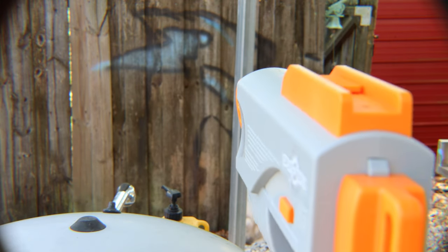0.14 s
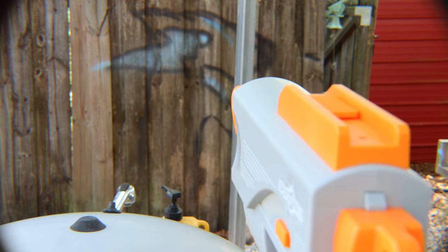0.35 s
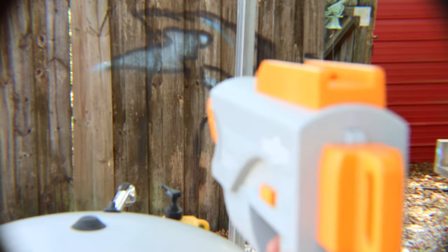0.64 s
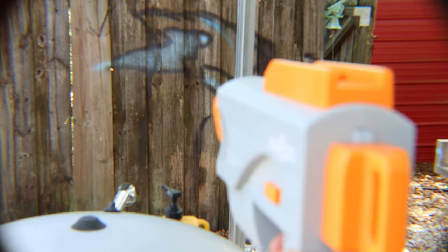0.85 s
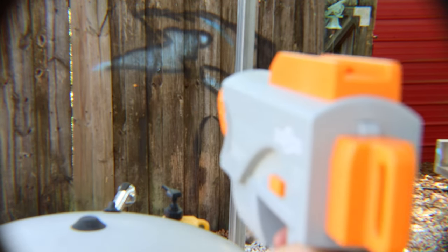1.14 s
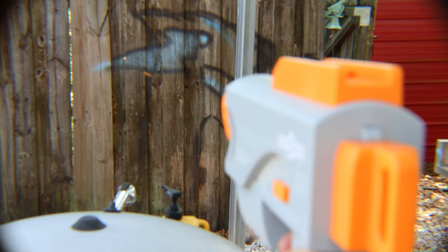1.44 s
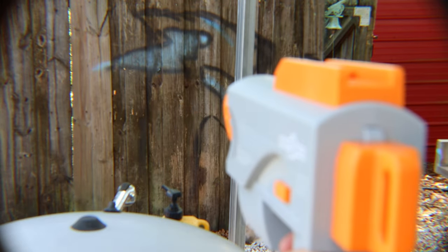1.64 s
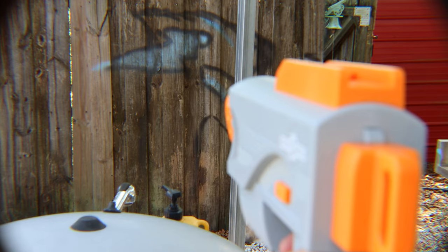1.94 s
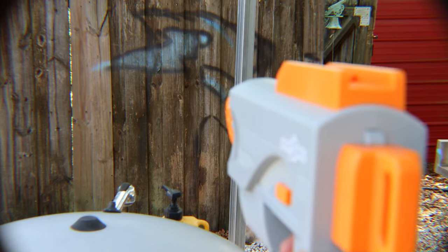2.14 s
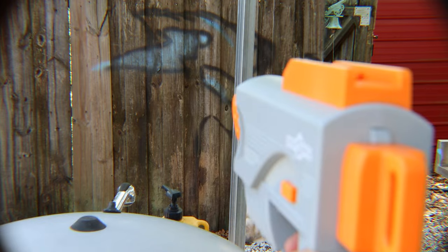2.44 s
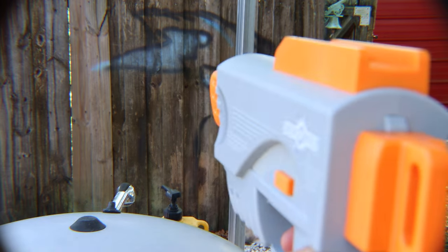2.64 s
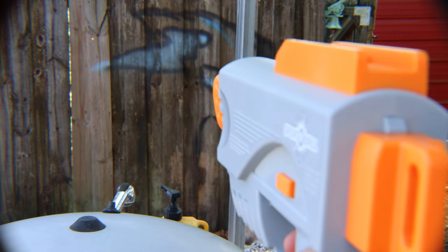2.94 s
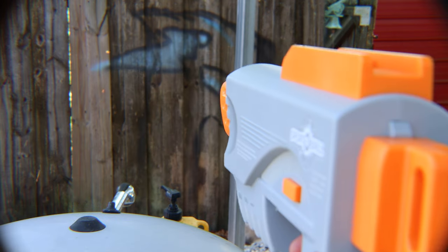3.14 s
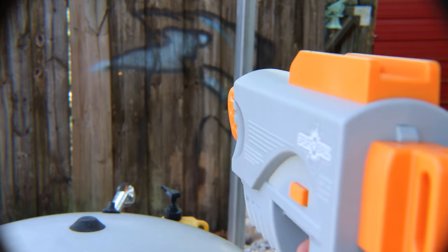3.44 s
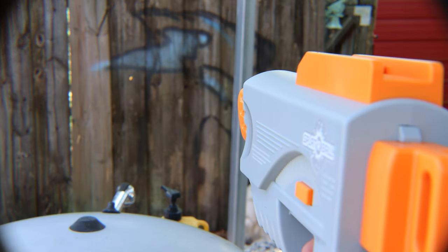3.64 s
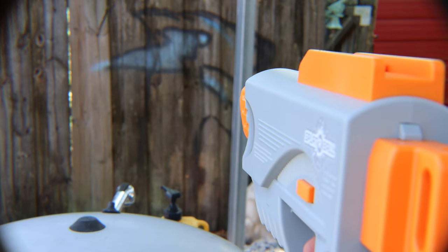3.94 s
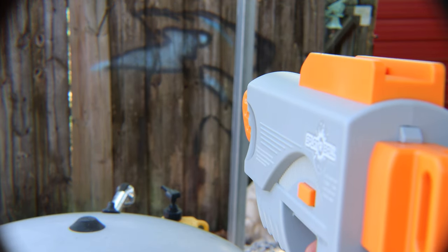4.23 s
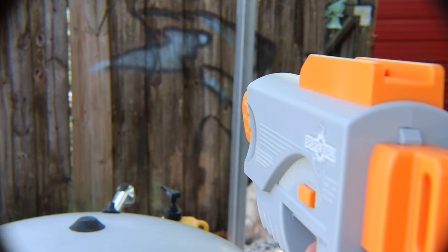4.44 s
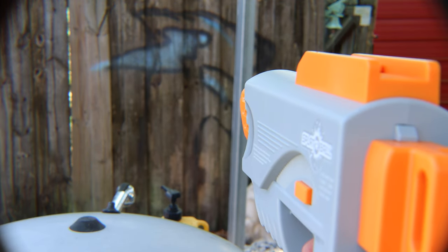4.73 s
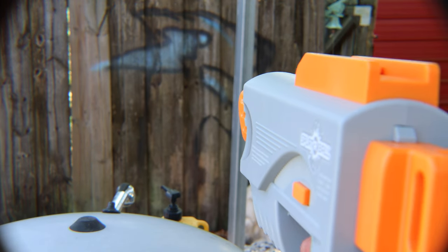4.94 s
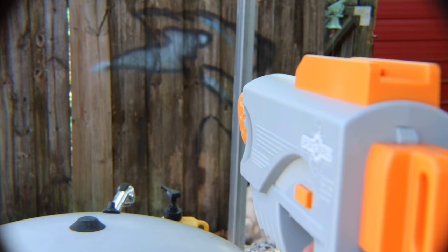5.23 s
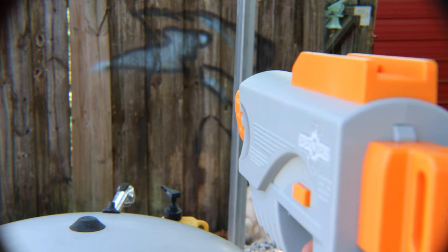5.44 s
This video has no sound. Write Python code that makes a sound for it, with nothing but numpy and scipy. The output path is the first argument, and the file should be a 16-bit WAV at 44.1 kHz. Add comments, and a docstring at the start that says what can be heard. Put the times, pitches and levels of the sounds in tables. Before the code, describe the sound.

Close-up, a motorized toy gun hammers about eight strokes a second, whirring gears, clicks and springy slams, then jams in a short scrape and restarts.

```python
"""A toy blaster rattles close by, about eight strokes a second: a whine that rises briefly and then falls, a click,
a slam, at times a pop. Gear teeth speed up briefly, then slow, as they compress a spring; a latch clicks and the
piston slams into the plastic shell. On some strokes trapped air bursts out behind a pellet; once, near the end,
the cycle stalls in a rumbling scrape. Gears are pulses and noise through resonances, impacts are causal filter
responses, the stall is shaped noise. A low hum of wavering sines and faint outdoor noise lie underneath."""
import sys
import numpy as np
from scipy import signal
from scipy.fft import rfft, irfft, next_fast_len
from scipy.io import wavfile
from scipy.ndimage import uniform_filter1d

SR = 44100
rng = np.random.default_rng(int(sys.argv[2]) if len(sys.argv) > 2 else 0)


def materialize(psi):
    """Save the field psi as 16-bit PCM at rate SR to the path in sys.argv[1].

    A 1-D psi becomes a single channel; in a 2-D psi each row is a channel.
    """
    bounded = np.clip(np.atleast_2d(psi).T, -1, 1)
    quanta = np.round(bounded * 32767).astype(np.int16)
    wavfile.write(sys.argv[1], SR, quanta)


N = 246739
TIME = np.arange(N) / SR


def undb(db):
    """Logarithmic level: decibels become an amplitude gain."""
    return 10 ** (np.asarray(db) / 20)


def unit(x):
    """Normalisation: scale a signal to an rms of 1."""
    return x / np.sqrt(np.mean(x ** 2))


def add(out, start_s, x):
    """Superposition: mix x into out from start_s."""
    i = max(0, int(round(start_s * SR)))
    out[i:i + len(x)] += x[:max(0, len(out) - i)]


def curve(table, at):
    """Linear interpolation: each column of a table joined by straight lines over its first."""
    key, *columns = np.transpose(table)
    return [np.interp(at, key, column) for column in columns]


def slope(points, size):
    """Spectral envelope: gain of (Hz, dB) points on transform bins, straight over log frequency."""
    hz, db = np.transpose(points)
    bins_hz = np.fft.rfftfreq(size, 1 / SR)
    return undb(np.interp(np.log(bins_hz + 1), np.log(hz), db))


def peaks(modes, size):
    """Modal resonance: gain of (Hz, width Hz, dB) peaks on transform bins, summed in power."""
    bins_hz = np.fft.rfftfreq(size, 1 / SR)
    power = 0
    for hz, width_hz, db in modes:
        power = power + (undb(db) / (1 + (2 * (bins_hz - hz) / width_hz) ** 2)) ** 2
    return np.sqrt(power)


def colour(x, shape, table):
    """Linear filtering: multiply the spectrum by slope or peaks, then scale to rms 1."""
    size = next_fast_len(len(x))
    filtered = irfft(rfft(x, size) * shape(table, size), size)
    return unit(filtered[:len(x)])


def ring(gain, spread_s, order=40):
    """Dispersion: a causal unit-energy response whose frequencies take paths of unequal delay, rms spread_s."""
    # folding the cepstrum onto positive time gives the minimum-phase response
    cepstrum = irfft(np.log(gain + 1e-7))
    size = len(cepstrum)
    cepstrum[1:size // 2] *= 2
    cepstrum[size // 2 + 1:] = 0
    # noise smoothed over order bins sets the extra delay of each frequency
    smooth = uniform_filter1d(uniform_filter1d(rng.standard_normal(len(gain)), order), order)
    late_s = spread_s * np.abs(unit(smooth))
    lag = 2 * np.pi * np.cumsum(late_s) * SR / size
    response = irfft(np.exp(rfft(cepstrum) - 1j * lag))
    fade = np.cos(np.linspace(0, np.pi / 2, size)) ** 2
    return unit(response * fade) / np.sqrt(size)


def walk(rate_hz):
    """Random modulation: normal draws at rate_hz, joined by straight lines, with a spread near 1."""
    count = int(N / SR * rate_hz) + 2
    return 1.2 * np.interp(TIME * rate_hz, np.arange(count), rng.standard_normal(count))


# Runs of nearly evenly spaced strokes. Each row: first latch click in seconds, last latch click in seconds.
BURSTS = [(0.0736, 0.5605), (0.6358, 2.4714), (2.6827, 3.5369), (3.6558, 4.8924), (5.2841, 5.5337)]
# nominal turn of the gearbox, and how much longer each turn in a run takes than the one before as the motor tires
CYCLE_S, SLOWING_S = .1225, .00007
FLIGHT_S = .0252  # from latch click to piston slam
# relative levels with an empty barrel, and their chance scatter from stroke to stroke
EMPTY_LATCH_DB, EMPTY_SLAM_DB, EMPTY_GEARS_DB, SCATTER_DB = -.3, -.7, -1.1, .4
# once the gear slips early: a weak slam and no latch click
SLIP_S, SLIP_DB = 2.5885, -7
# once the cycle stalls after a muted latch click, until the piston lets go
STALL_S, RELEASE_S, STALL_LATCH_DB = 5.0182, 5.1778, -3


def strokes():
    """Periodic excitation: all cycles as (latch click s, slam s, latch dB, slam dB, gears dB), in order."""
    rows = [(SLIP_S - FLIGHT_S, SLIP_S, -np.inf, SLIP_DB, EMPTY_GEARS_DB),
            (STALL_S, RELEASE_S, STALL_LATCH_DB, EMPTY_SLAM_DB, EMPTY_GEARS_DB)]
    empty_db = np.array([EMPTY_LATCH_DB, EMPTY_SLAM_DB, EMPTY_GEARS_DB])
    for first_s, last_s in BURSTS:
        turns = int(round((last_s - first_s) / CYCLE_S))
        k = np.arange(turns + 1)
        even_s = first_s + (last_s - first_s) * k / turns
        for latch_s in even_s - SLOWING_S * k * (turns - k) / 2:
            levels = empty_db + SCATTER_DB * rng.standard_normal(3)
            # a pellet soon after the click gives the stroke its own levels
            for pellet_s, _, _, *loaded in PELLETS:
                if 0 < pellet_s - latch_s < CYCLE_S / 2:
                    levels = loaded
            rows.append((latch_s, latch_s + FLIGHT_S, *levels))
    return sorted(rows)


# Low hum. Each row: frequency in Hz, rms level in dB.
HUM = [(58, -41.5), (107, -44.5), (117, -51)]
# Spectrum of the outdoor air. Each row: frequency in Hz, relative level in dB.
YARD_AIR = [(20, -26), (36, -16), (50, -13), (80, 3), (120, -5), (200, -12), (500, -7.5), (1500, -2),
            (5000, -25), (10000, -30), (16000, -41)]


def yard():
    """Additive synthesis: sines wavering in pitch and level hum over filtered noise, the outdoor air."""
    hum = 0
    for hz, db in HUM:
        wavering_hz = hz + 1.6 * walk(14)
        tone = undb(1.5 * walk(9)) * np.sin(2 * np.pi * np.cumsum(wavering_hz) / SR)
        hum = hum + undb(db) * unit(tone)
    air = colour(rng.standard_normal(N), slope, YARD_AIR)
    return hum + undb(-38 + walk(3.02)) * air


# Course of one stroke. Each row: share of the cycle from 0 to 1, tooth rate in Hz, and the relative levels
# of teeth and grinding in dB.
STROKE = [(0, 1700, -24, -3.5), (.2, 2018, -10, -3.5), (.42, 1956, -3, -1.5), (.59, 1783, -0.5, 0.5),
          (.7, 1680, 0.5, 1), (.8, 1609, -1, 2), (.92, 1521, 0, 1.5), (1, 1499, 0.5, 3.5)]
# Gearbox wall that radiates the whine. Each row: frequency in Hz, width in Hz, relative level in dB.
GEARBOX = [(1868, 430, -0.5), (3295, 410, 0), (5560, 410, -16), (6200, 1100, -38)]
# Spectrum of the grinding. Each row: frequency in Hz, relative level in dB.
GRIND = [(40, -12.5), (130, -6), (300, -3.5), (450, -0.5), (700, -3.5), (1300, -3), (2000, 2), (2600, 0.5),
         (3300, 1.5), (4300, -6.5), (6200, -9), (8000, -15), (11000, -23.5), (16000, -42)]
# Sharp rasp of the teeth under load. Each row: frequency in Hz, width in Hz, relative level in dB.
RASP = [(4200, 1000, -1.5), (5150, 980, -2.5), (5970, 1130, -0.5), (7070, 600, -4.5)]
# The aim of the blaster trades fine hiss against rasp. Each row: time in seconds, then relative levels in dB
# of hiss, of rasp, and of grinding and rasp together.
AIM = [(0, -8, -4, 1.5), (.5, -7, -4, .5), (.7, -1.5, -2.5, 0), (2.45, -2.5, -6, .3), (2.7, -9, -0.5, 0),
       (3.6, -8, 0, -1.3), (4.1, -8, 0, .4), (4.9, -7.5, 0, .3), (5.6, -7, -0.5, -1)]
# the spring's note rises as it settles after a slam
SING_FROM_HZ, SING_TO_HZ, SING_SETTLE_S = 378, 397, .02
# its level at a 0 dB slam, its dB per dB of slam, and the share of the cycle at which closing coils silence it
SING_DB, SING_FOLLOWS, SING_END = -27.3, .35, .98


def gears(shots):
    """Gear-mesh excitation: teeth speed up briefly, then slow, and mostly rub harder, as the spring is compressed."""
    phase, drive, effort = np.zeros((3, N))
    start = shots[0][1] - CYCLE_S
    # time since the last slam, and the level of that slam
    age, struck_db = TIME - start, np.full(N, 1. * EMPTY_SLAM_DB)
    for latch_s, slam_s, _, slam_db, gears_db in shots:
        stop = latch_s if latch_s == STALL_S else slam_s
        now = TIME >= start
        phase[now] = np.clip((TIME[now] - start) / (stop - start), 0, 1)
        drive[now] = np.exp(-np.maximum(TIME[now] - stop, 0) / 0.039)  # in a stall the gears coast to rest
        effort[now] = undb(gears_db)
        after = TIME >= slam_s
        age[after], struck_db[after] = TIME[after] - slam_s, slam_db
        start = slam_s
    last = TIME >= start
    phase[last], drive[last] = (TIME[last] - start) / CYCLE_S, 1
    tooth_hz, tooth_db, grind_db = curve(STROKE, phase)

    teeth = np.cumsum(tooth_hz * (1 + .006 * walk(25) + .03 * walk(1600))) / SR  # teeth passed so far
    mesh = sum(np.cos(2 * np.pi * k * teeth) for k in range(1, 5))
    # pinion (9 teeth) and wheel (26) run slightly off centre and every tooth bites differently
    pinion = 1 + .5 * np.cos(2 * np.pi * teeth / 9)
    wheel_db = 3 * np.cos(2 * np.pi * teeth / 26)
    bite = pinion * undb(wheel_db + 2.5 * walk(500))
    whine = colour(mesh * bite, peaks, GEARBOX) * undb(tooth_db)

    # the flanks rub once a tooth
    once_a_tooth = 1 + .5 * np.cos(2 * np.pi * teeth)
    rub = rng.standard_normal((3, N)) * once_a_tooth * undb(1.5 * walk(600))
    hiss_db, rasp_db, gear_db = curve(AIM, TIME)
    grind = colour(rub[0], slope, GRIND) * undb(grind_db - 26.3)
    # rasp grows faster with load than the grinding
    rasp = colour(rub[1], peaks, RASP) * undb(1.5 * grind_db + rasp_db - 31)
    hiss = colour(rub[2], peaks, [(8660, 2400, 0)]) * undb(hiss_db + grind_db - 42.5)

    # each slam sets the spring singing, until it is nearly closed
    settling = (SING_TO_HZ - SING_FROM_HZ) * SING_SETTLE_S * np.exp(-age / SING_SETTLE_S)
    cycles = SING_TO_HZ * age + settling
    note = unit(np.sin(2 * np.pi * (cycles + .04 * walk(100))) * undb(1.5 * walk(80)))
    free = np.clip(np.minimum(phase / .1, 1 - phase / SING_END), 0, 1)
    singing = note * undb(SING_DB + SING_FOLLOWS * struck_db) * free

    loaded = undb(-26.0) * whine + undb(gear_db) * (grind + rasp)
    return drive * (effort * loaded + hiss + singing)


# The latch's bright ring. Each row: frequency in Hz, width in Hz, relative level in dB.
LATCH = [(550, 520, -8), (846, 160, -6.5), (1360, 1900, -6), (2027, 103, 2.5), (2720, 980, -6.5),
         (3480, 140, -8), (4060, 460, -5), (4660, 350, -3.6), (5770, 337, -4), (6400, 1970, -5),
         (6540, 279, -7.5), (8080, 600, -9.5), (9350, 850, -21.5), (11050, 640, -23), (15183, 5300, -27)]


def latch(shots, size=4096):
    """Small-source radiation: a short bright click and its chatter, from a part too small to radiate bass."""
    out = np.zeros(N)
    bass_cut = slope([(60, -27), (220, -29), (450, -6)], size)
    gain = peaks(LATCH, size) * bass_cut
    for latch_s, _, db, *_ in shots:
        snap = ring(gain, spread_s=.0007, order=12)
        chatter = ring(gain, spread_s=.0015, order=12)
        add(out, latch_s, undb(db + 9) * snap)
        add(out, latch_s + 0.00098, undb(db + 6) * chatter)
    return out


# Shell and empty barrel under the piston's blow. Each row: frequency in Hz, width in Hz, relative level in dB.
SHELL = [(168, 55, -12), (228.4, 25, -8), (317.7, 32, -2.5), (365, 69, -4), (523, 85, -6), (603, 32, -8),
         (728, 107, -8.5), (897, 173, -1), (1059, 400, -8.5), (1090, 34, -8.5), (1301, 34, -24.5),
         (1448, 150, -8), (1702, 98, -15), (1825, 190, -6), (2054, 136, -4), (2209, 62, -5.5),
         (2384, 95, -6), (2480, 320, -8.1), (2787, 560, -10.5), (3160, 1200, -38), (3520, 52, -21.5),
         (3540, 300, -57), (3900, 2100, -20.5), (4700, 2200, -30), (6070, 7000, -28), (8560, 800, -31.0)]
# The spring's lasting twang. Each row: frequency in Hz, width in Hz, relative level in dB.
SPRING = [(343, 44.5, -9), (390.8, 9.2, -6), (420, 47, -13), (507, 7.3, -12), (1133, 33.5, -8.5)]
# Tilt of the spring's rattle. Each row: frequency in Hz, relative level in dB.
CLATTER = [(200, -18), (400, 8.5), (900, -1), (1150, 2), (2300, -6.5), (4000, 3), (8000, -20)]
# The spring's rebound against its guide. Each row: frequency in Hz, width in Hz, relative level in dB.
REBOUND = [(1140, 160, -7), (2350, 124, 7.5), (2910, 390, -1.5), (4130, 700, -11)]


def piston(shots, size=8192):
    """Impact excitation: the slam rings the shell, and the spring twangs, surges and rebounds on its guide."""
    out, t = np.zeros(N), np.arange(size) / SR
    blow = ring(peaks(SHELL, size), spread_s=.0024, order=22)
    # the ring is boosted towards 7 ms, then damped as the piston seats
    blow = blow * undb(np.interp(t, [0, .003, .007, .0105], [-0.86, -1.25, 4.3, 0.25]))
    twang = ring(peaks(SPRING, size), spread_s=0.0008)
    surge_db = 2.9 * np.cos(2 * np.pi * t / 0.0129)
    surge = np.exp(-t / 0.024) * (1 - np.exp(-t / 0.0046)) * undb(surge_db)
    seat = rng.standard_normal(size)  # the spring hits much the same places each time
    for _, slam_s, _, db, _ in shots:
        rattle = (seat + 0.41 * rng.standard_normal(size)) * surge
        through_shell = np.convolve(rattle, blow[:size // 8])[:size]
        clatter = colour(through_shell, slope, CLATTER)
        slam = undb(db + 17.0) * blow + undb(0.72 * db + .5) * twang + undb(0.84 * db - 32.5) * clatter
        add(out, slam_s, slam)
        rebound = ring(peaks(REBOUND, size), spread_s=.0009, order=22)
        add(out, slam_s + .0165, undb(-1.0) * rebound)
    return out


# Pellets leaving the barrel, each cushioning its stroke. Each row: time in seconds, relative level in dB,
# pop centre in Hz, then the relative levels of that stroke's latch, slam and gears in dB.
PELLETS = [(0.5866, -4.5, 1020, -1, -9, 0.5), (0.6597, -4, 2190, -10, -12, 1.5),
           (0.7852, -3.5, 2130, -3.5, -10.5, 0), (0.9075, -1.5, 2280, -6.5, -11, 0.5),
           (1.0279, -3, 1610, -9, -8, -1), (1.1483, -4.5, 1210, -1.5, -7, -1),
           (1.272, -3, 1140, -9.5, -8.5, 1), (1.3948, -1.5, 1730, -6, -9, 1),
           (1.5175, -2.5, 1840, -5.5, -13, -1), (1.6397, -4.5, 2340, -4, -8.5, -0.5),
           (1.7611, -4, 1210, -5, -7.5, 2), (2.9541, -3.5, 2310, -12, -11, -1),
           (3.0731, -7, 1000, -10, -4.5, -1.5), (3.197, -3.5, 2380, -10, -16, 1.5),
           (3.4421, -3.5, 1930, -6.5, -8.5, -0.5)]
# Spectrum of the air burst. Each row: frequency in Hz, relative level in dB.
POP = [(60, -16), (200, -2.5), (450, 1), (850, -3), (1300, -1), (2500, -2.5), (3400, -11.5), (6000, -21),
       (10000, -24), (16000, -46)]


def pellets(size=4096):
    """Pressure release: trapped air bursts out behind each pellet, with a different ring every time."""
    out = np.zeros(N)
    for pellet_s, db, hz, *_ in PELLETS:
        gain = slope(POP, size) * (1 + 0.93 * peaks([(hz, 500, 0)], size))
        pop = ring(gain, spread_s=0.002013, order=12)
        add(out, pellet_s, undb(db + 17) * pop)
    return out


# Spectrum of the stall's rumble. Each row: frequency in Hz, relative level in dB.
RUMBLE = [(20, -19), (35, -20), (55, 10), (90, -6), (160, -8.5), (400, -11.5), (1000, -14), (4000, -51)]
# Spectrum of the stall's scrape. Each row: frequency in Hz, relative level in dB.
SCRAPE = [(100, -5), (400, -4), (1200, -6), (2500, 2.5), (3500, -1), (6000, -7.5), (9000, -18),
          (16000, -31)]
# rumble: level, delay after the gears stop, attack, and release that ends as the piston lets go
RUMBLE_DB, RUMBLE_DELAY_S, RUMBLE_ATTACK_S, RUMBLE_RELEASE_S = -18, .015, .1, .01
# scrape: level as the piston lets go, growth before and decay after
SCRAPE_DB, SCRAPE_RISE_DB_PER_S, SCRAPE_FALL_DB_PER_S = -9.5, 370, 2600


def stall():
    """Friction noise: a low rumble and a rough scrape swell until the stalled piston lets go."""
    after = TIME - RELEASE_S
    attack = np.clip((TIME - STALL_S - RUMBLE_DELAY_S) / RUMBLE_ATTACK_S, 0, 1)
    release = np.clip(-after / RUMBLE_RELEASE_S, 0, 1)
    scrape_db = SCRAPE_DB + np.minimum(SCRAPE_RISE_DB_PER_S * after, -SCRAPE_FALL_DB_PER_S * after)
    rumble = colour(rng.standard_normal(N), slope, RUMBLE)
    scrape = colour(rng.standard_normal(N) * undb(3.9 * walk(300)), slope, SCRAPE)
    return rumble * undb(RUMBLE_DB) * attack * release + scrape * undb(scrape_db)


def scene():
    """Superposition of all sources at one microphone, the same on both channels."""
    shots = strokes()
    mono = gears(shots) + latch(shots) + piston(shots) + pellets() + stall() + yard()
    return np.array([mono, mono])


def record(dry):
    """Saturation and band-limiting: peaks round off below a ceiling and the top is cut."""
    ceiling, top_hz = .57, 16200
    rounded = dry / (1 + (dry / ceiling) ** 4) ** (1 / 4)
    low_pass = signal.ellip(8, .1, 50, top_hz, fs=SR, output="sos")
    return signal.sosfiltfilt(low_pass, rounded)


dry = scene()
out = record(dry)
materialize(out)
```